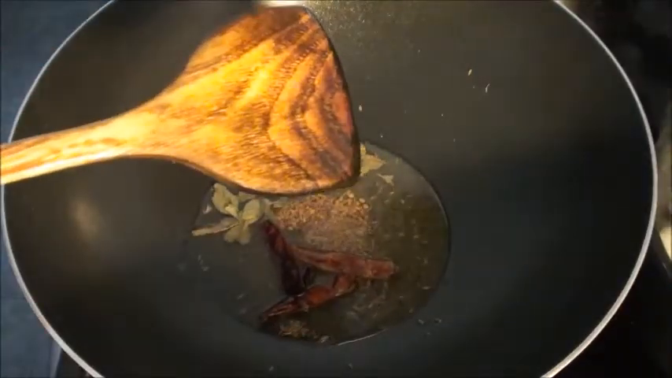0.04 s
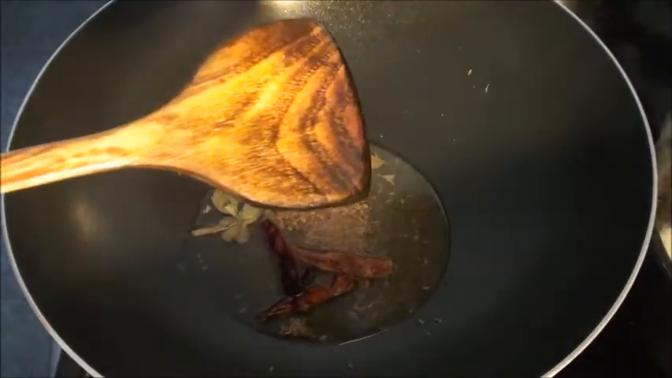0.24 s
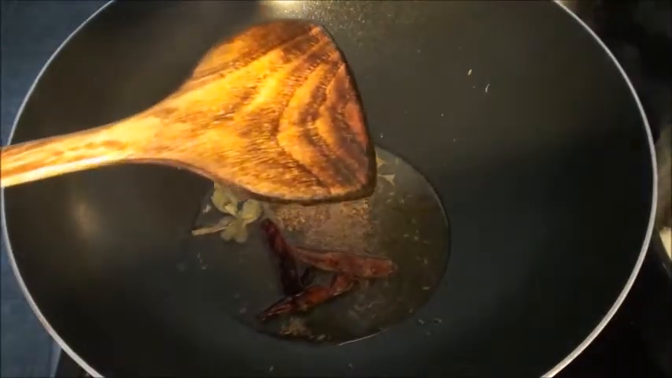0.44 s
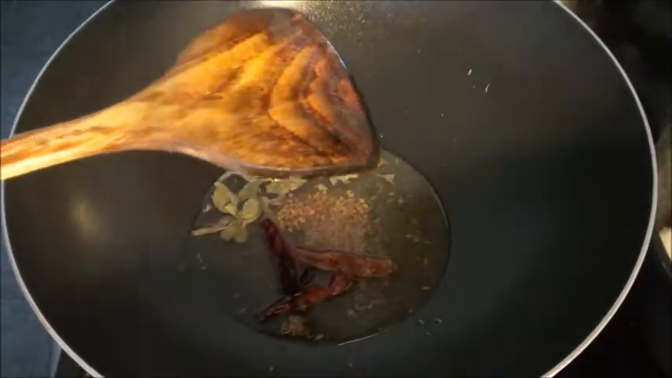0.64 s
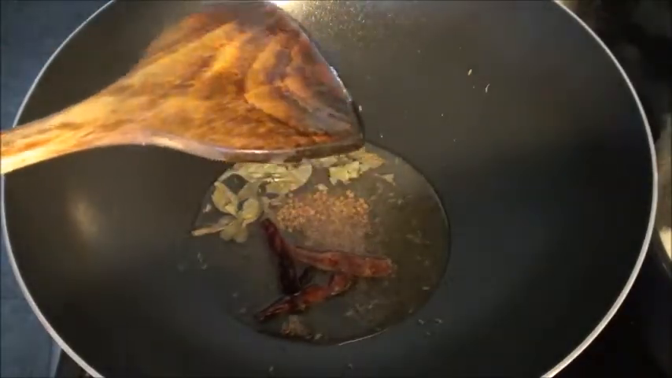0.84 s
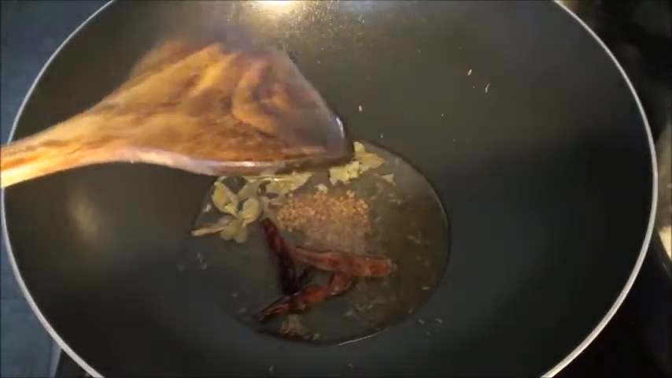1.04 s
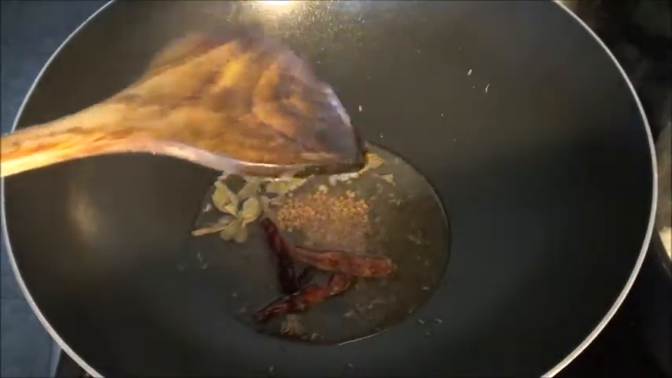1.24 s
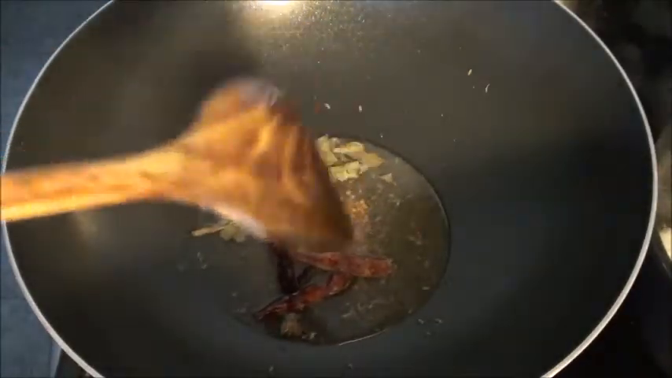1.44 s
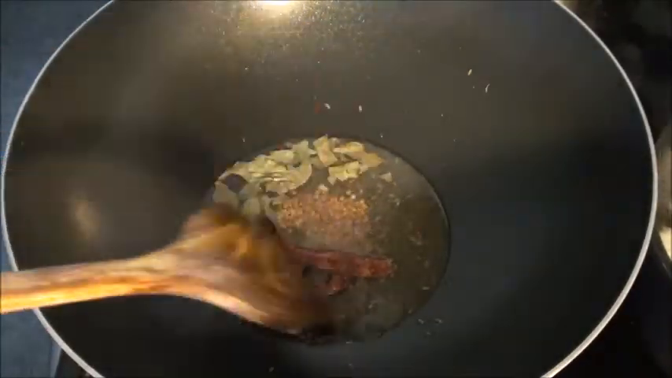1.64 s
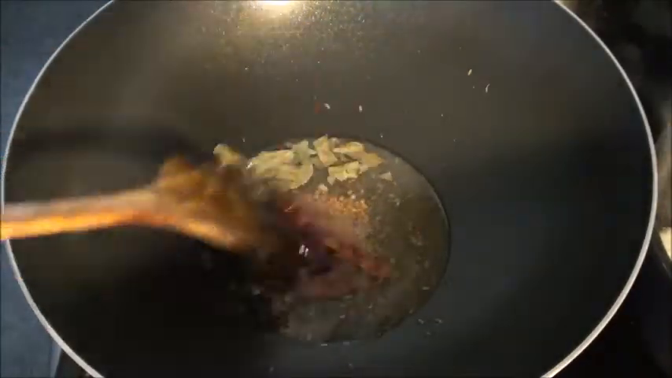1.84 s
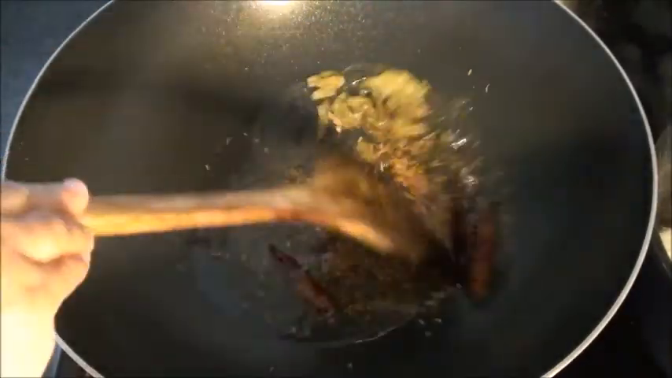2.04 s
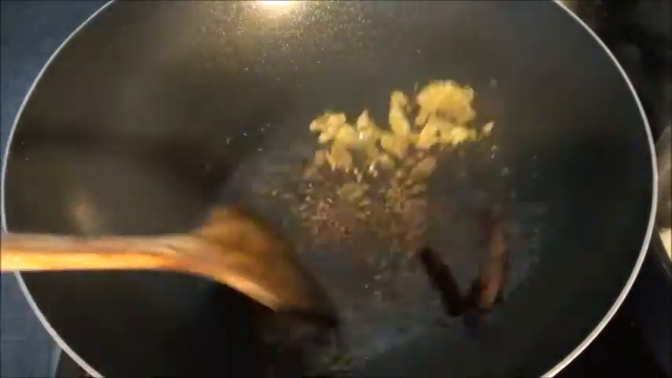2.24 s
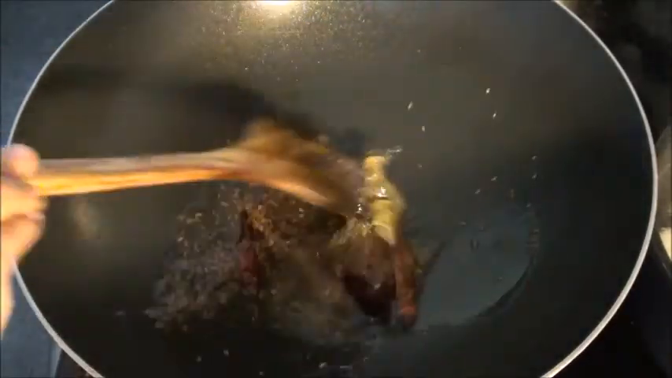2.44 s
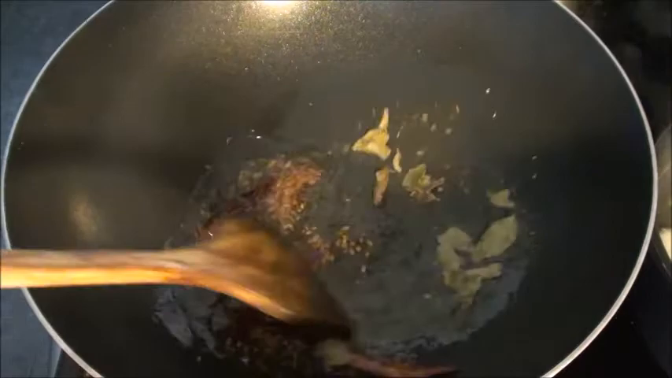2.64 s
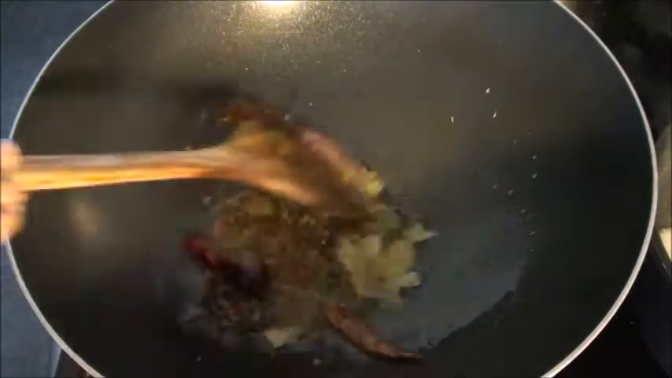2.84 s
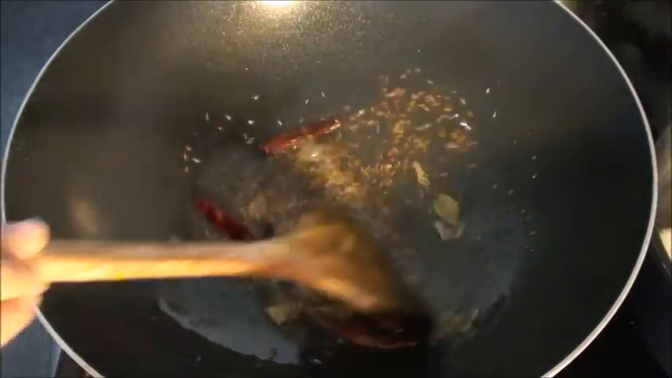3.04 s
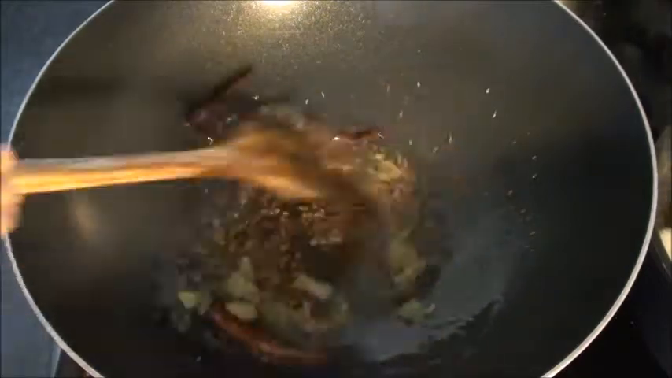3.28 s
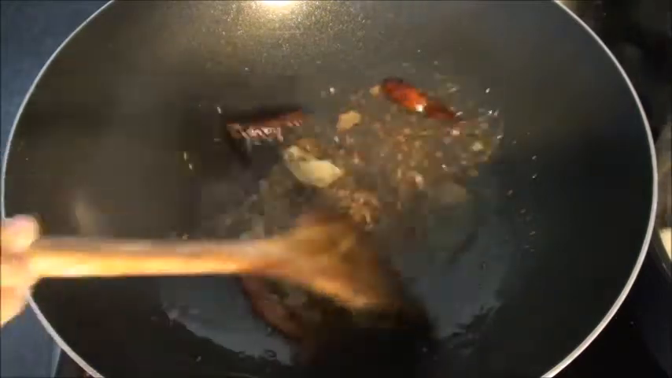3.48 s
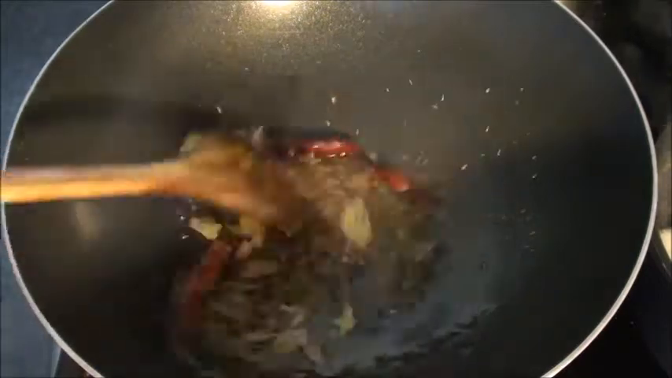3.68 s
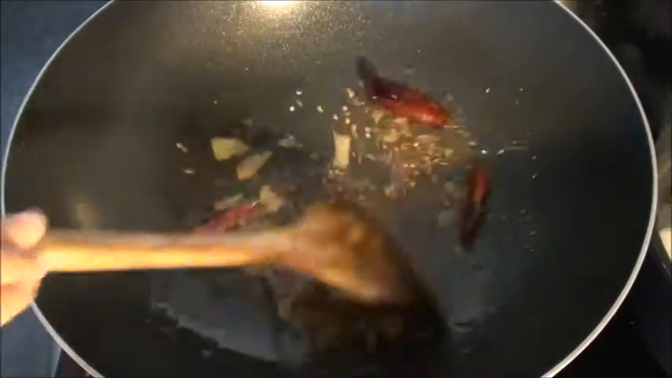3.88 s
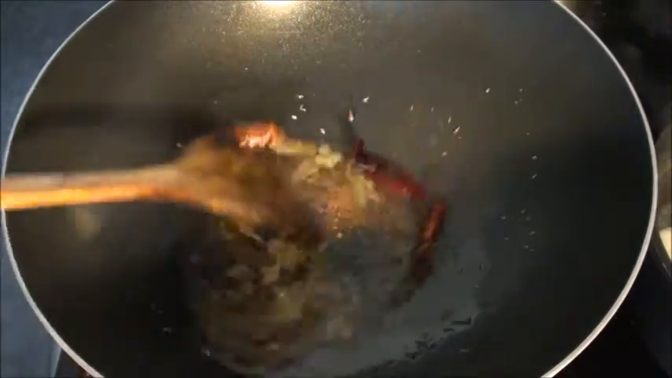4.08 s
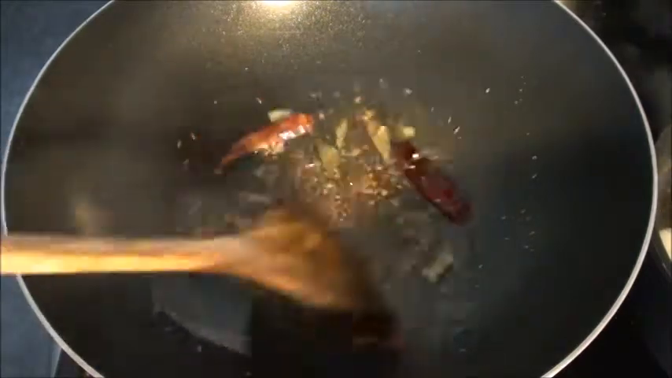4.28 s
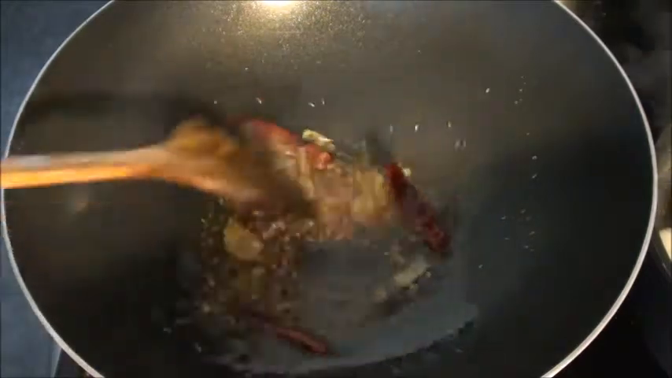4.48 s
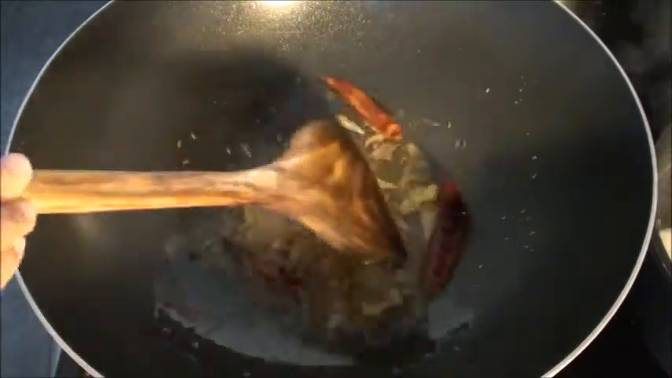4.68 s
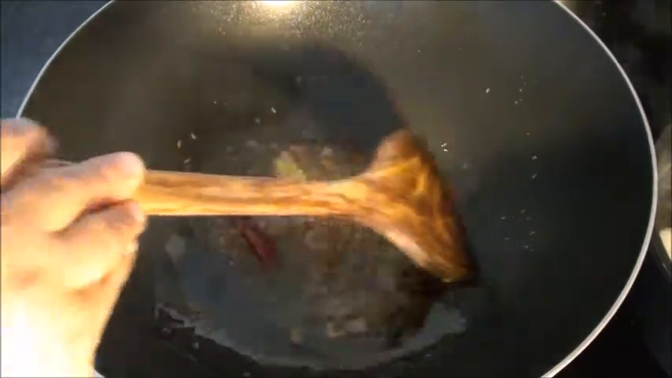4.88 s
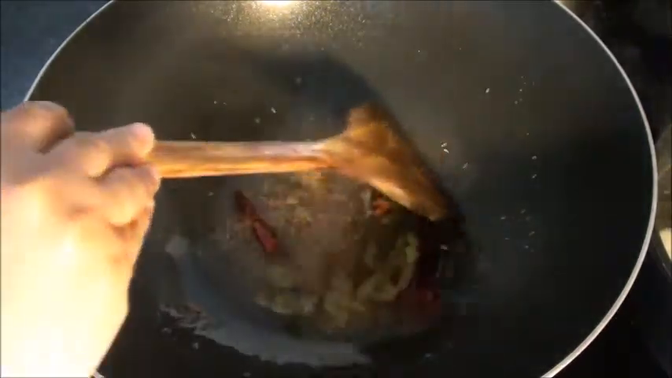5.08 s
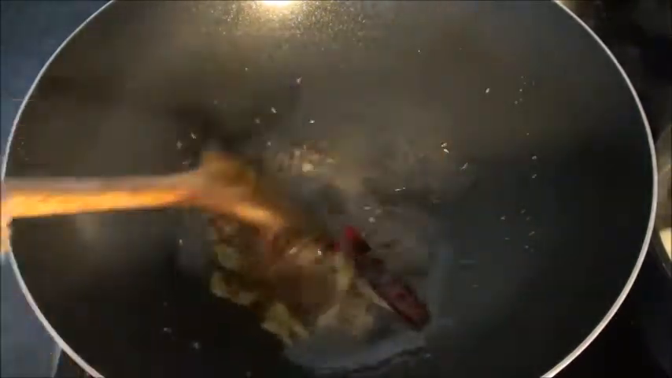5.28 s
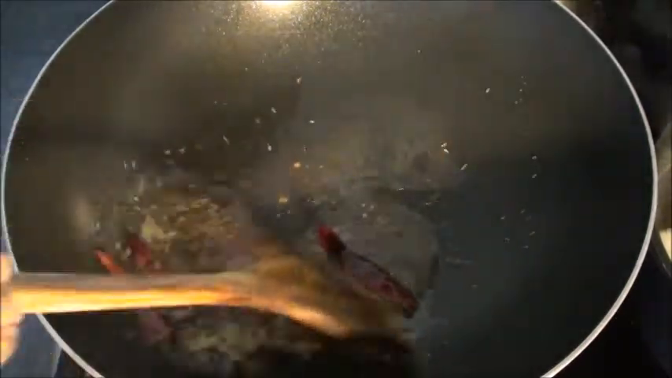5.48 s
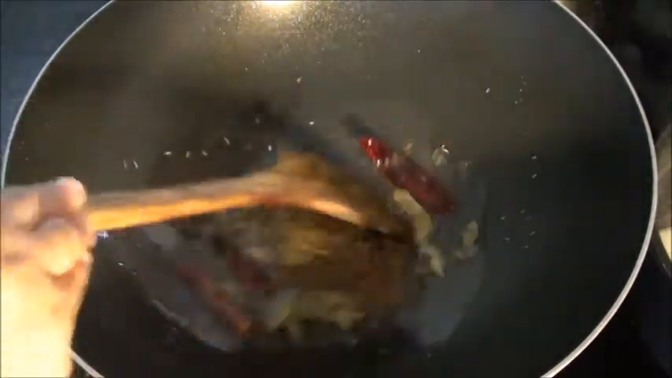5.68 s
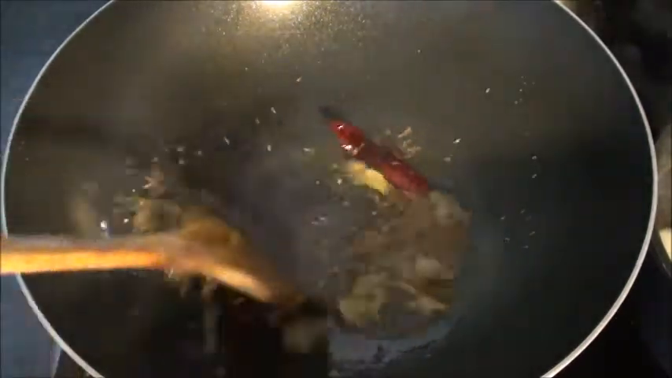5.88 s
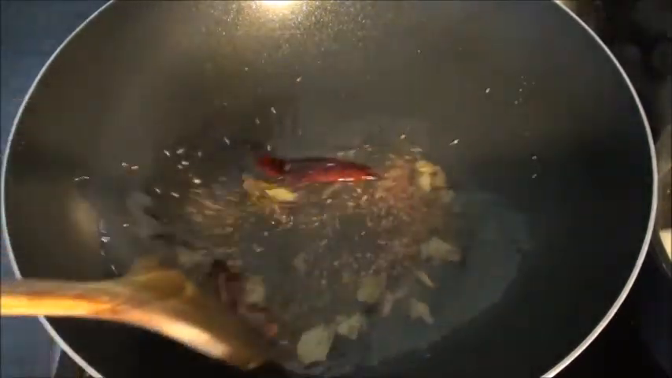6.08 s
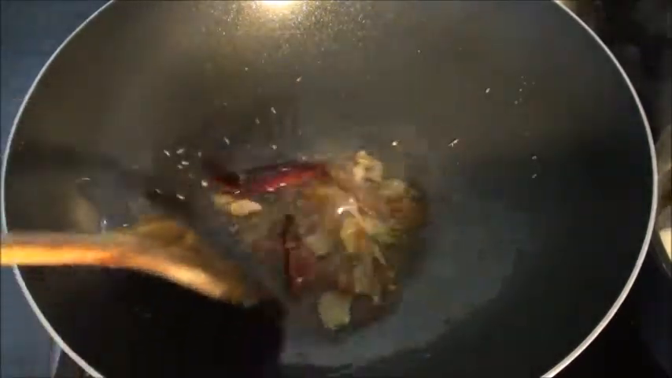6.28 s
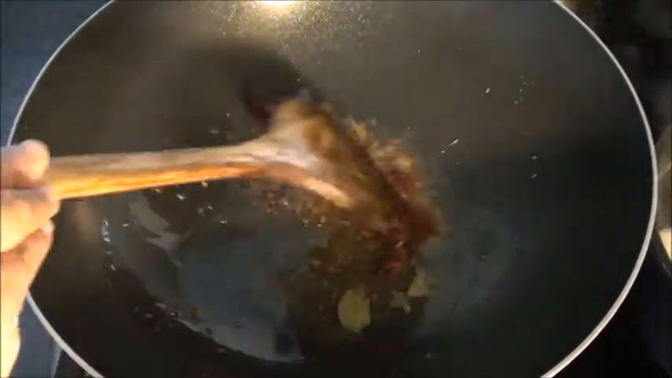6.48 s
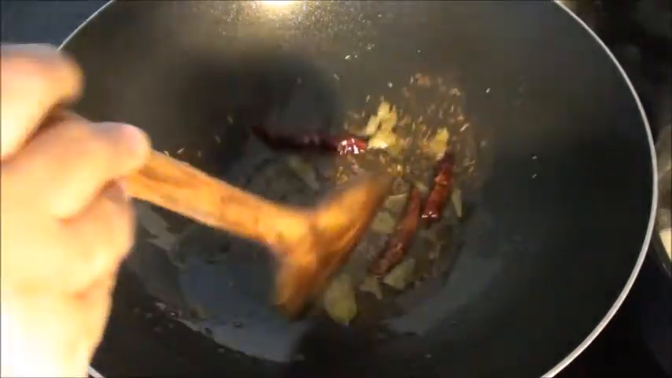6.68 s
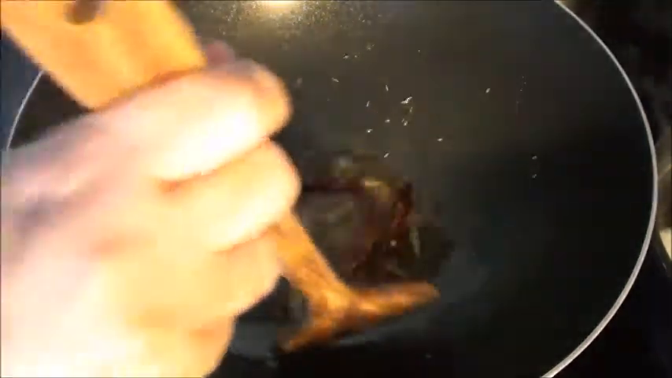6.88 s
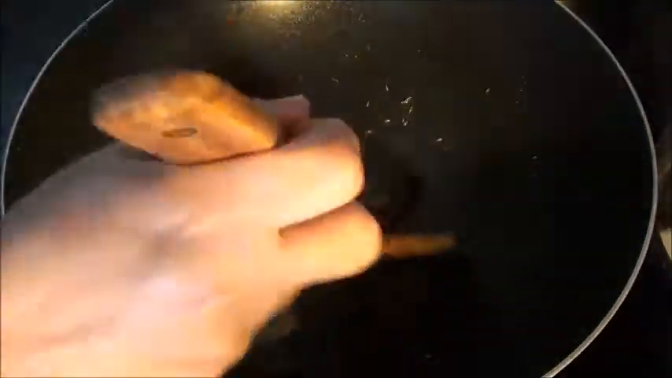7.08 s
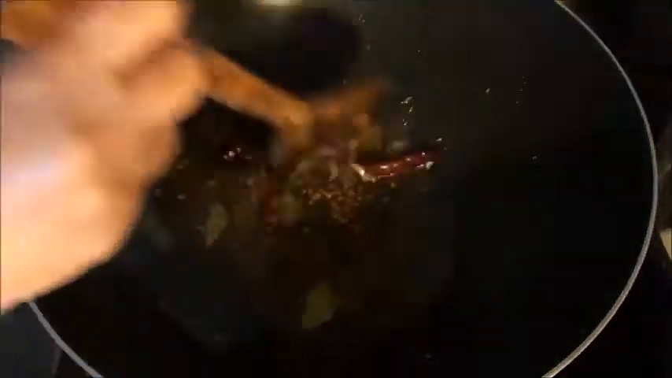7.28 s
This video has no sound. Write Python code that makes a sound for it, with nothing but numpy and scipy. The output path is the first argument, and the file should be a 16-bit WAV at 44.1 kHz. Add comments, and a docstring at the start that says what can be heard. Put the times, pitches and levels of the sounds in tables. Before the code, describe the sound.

Nearly two seconds of quiet simmering with bright, isolated oil snaps and an early ringing clatter of a utensil out of sight. Then a dull wooden thud starts a sudden rush of crackling, hissing frying. Dull spatula bumps and gritty seed cracks come irregularly; later the sizzle dips and flares with slower strokes. Close microphone, nearly central image, short kitchen echo, low electric hum and soft air.

```python
"""Single steam bubbles burst sharply over a fine simmer while a utensil clatters out of sight; then a wooden
spatula stirs moist whole spices in hot oil and the pops merge into a loud sizzle that slowly thins.
Bubbles are short decaying sine bursts echoing round a steel wok, massed at random for the sizzle; the spatula
and utensil are struck modes with noise for rubbing and rattling, and crushed seeds are runs of cracks.
Behind it all lie a low electric hum of wavering sines and soft, filtered-noise kitchen air."""
import sys
import numpy as np
from scipy import signal
from scipy.fft import rfft, irfft
from scipy.io import wavfile
from scipy.ndimage import uniform_filter1d, minimum_filter1d

SR = 44100
rng = np.random.default_rng(int(sys.argv[2]) if len(sys.argv) > 2 else 0)


def bounce(signal):
    """Save signal as a 16-bit WAV file at the path given by the first command-line argument."""
    frames = np.transpose(np.atleast_2d(signal))
    limited = np.clip(frames, -1, 1)
    pcm = np.round(limited * 32767).astype(np.int16)
    wavfile.write(sys.argv[1], SR, pcm)


N = 322812

# How hard the stirred spices fry, flaring with each of the last, slower strokes.
# Each row: time in seconds, level in dB before the coarse and spray balance.
STIRRED_LEVEL = [(1.79, -22.5), (2.06, -15), (2.5, -15), (3.3, -13.5), (3.45, -14.5), (4.1, -15),
                 (4.85, -17.5), (5.24, -20.5), (5.5, -17), (5.97, -16), (6.12, -20.5), (6.53, -16),
                 (6.8, -19.5), (6.89, -22), (7.1, -20.5), (7.32, -18)]
# Tone of the frying. Each row: frequency in Hz, relative gain in dB.
SIZZLE_TONE = [(250, -45), (700, -15), (1100, -13.5), (1600, -6.5), (2400, -10), (3100, -1.5), (4500, 0.5),
               (6500, 1.5), (8000, -.5), (9000, -6), (11000, -11), (13000, -21), (16000, -19.5)]
# The fine simmer before the stirring. Each row: time in seconds, level in dB.
SIMMER_LEVEL = [(0, -26), (.5, -30.5), (.63, -32.5), (1.12, -33), (1.25, -35), (1.4, -30), (1.78, -36)]
# Loud steam bursts, and single seed cracks under the blade (the low-pitched rows during the stirring). # Each
# row: start in seconds, peak in dB before the pop tone, pitch in Hz, # cycles until 60 dB down, bowl echo in dB
# against the direct burst.
SHARP_POPS = [(0.0865, -8, 7050, 7, 8), (0.3672, -1.5, 5900, 9, 5), (0.395, -9, 4430, 8, 11),
              (0.4208, -1, 3230, 24, -1), (0.5139, -8.5, 3780, 2.6, 10), (0.538, -8, 5290, 4, 13),
              (0.6968, -5.5, 2750, 2.2, 3), (0.7285, -0.5, 4860, 7.8, 3), (0.8265, -10, 4730, 1.4, 7),
              (0.872, -11.5, 3500, 8.8, -3), (0.894, -5, 7300, 14, 4), (0.934, -7.5, 4900, 2, 17),
              (1.0438, -9.5, 6450, 29, 0), (1.165, -9.5, 3920, 4, 4), (1.3219, -2, 3040, 6.4, -1),
              (1.344, -5, 4850, 12, 5), (1.414, -13.5, 8900, 5, 1), (1.4257, -7.5, 3180, 3.7, -3),
              (1.4337, -0.5, 7500, 3.4, 2.5), (1.5324, -3.5, 3080, 1.3, 6), (1.5688, -6, 8500, 7, -2),
              (1.6356, -4.5, 6500, 17, 15), (1.6912, -13, 6400, 16, 7), (1.736, -9, 7000, 27, 0),
              (1.8043, -8, 4270, 12, 7), (1.8543, -7, 8000, 18, -4), (1.8782, -1.5, 3330, 8, 4),
              (1.9691, 6, 7700, 3.1, 11), (2.163, 1.5, 4070, 15, 10), (2.4334, -1, 2180, 10, 0),
              (2.5888, -2, 2030, 19, 1), (2.7222, -1.5, 3660, 19, 3), (3.2044, 4.5, 2220, 14, -6),
              (3.9108, 0, 3280, 3, 6), (3.9934, 4.5, 3300, 14, 1), (4.3187, -1, 2400, 2.5, 10),
              (4.4425, 2.5, 2150, 18, 7), (5.1043, 2, 3060, 3.2, -2), (5.1977, 7, 3430, 4.6, -9),
              (5.2914, 7, 5030, 3.2, -5), (5.848, 13, 5670, 4, -1), (5.9247, 4.5, 4340, 4.3, 5),
              (6.5998, 4, 7000, 21, 2.5), (6.651, 5.5, 6490, 31, -11), (6.7417, -2, 7200, 15, -2),
              (6.7988, -1.5, 4760, 11, 8), (7.012, 10, 4700, 7.4, -1), (7.1154, 11.5, 2530, 3.3, -10.5)]
# Tone of pops and plops. Each row: frequency in Hz, gain in dB.
POP_TONE = [(150, -15), (600, -14), (1200, -7), (3000, -0.5), (8000, 4), (9500, -4.5), (13000, -4),
            (16000, -16)]
# Big slow bubbles. Each row: start in seconds, peak in dB before the pop tone, pitch in Hz.
SLOW_BUBBLES = [(0.036, -8, 1570), (0.0642, -2, 1300), (0.1353, -10, 1850), (1.5426, -12.5, 1490),
                (1.886, -7, 1700), (3.4185, -12, 1420), (3.996, -2, 1520), (4.7997, -2, 1950),
                (5.1484, -8, 1600)]
# Spatula against the wok. Each row: start in seconds, thud peak in dB before the contact filter.
SPATULA_KNOCKS = [(1.797, -17), (1.848, -33), (2.135, -36), (2.385, -38), (2.51, -39), (2.796, -34),
                  (2.95, -40), (3.225, -38), (3.266, -19.5), (4.483, -35), (5.048, -20.5), (5.712, -28),
                  (6.135, -32), (6.165, -38), (6.913, -32)]
# Modes of the wok on its stand. Each row: frequency in Hz, relative level in dB, 60 dB decay in seconds.
WOK_MODES = [(143, 0, 0.18), (160, 15, 0.062), (204, -16, 0.045), (249, -8.5, 0.028), (336, -4, 0.097),
             (393, -0.5, 0.074), (491, 3.5, 0.1), (629, 7, 0.068), (715, -11, 0.028), (830, 4, .04)]
# What a soft, oily contact passes on. Each row: frequency in Hz, gain in dB.
CONTACT_TONE = [(30, -13), (80, -10), (125, 4), (600, 4), (900, -6.5), (2000, -36)]
# Wood rubbing on oiled steel. Each row: frequency in Hz, relative gain in dB.
RUB_TONE = [(40, -18.5), (90, -14), (140, 8.5), (180, 1), (250, -11), (480, -12), (700, -13.5), (1200, -18),
            (4000, -69)]
# The blade grinds over seeds. Each row: start in seconds, length in seconds, highest possible crack peak
# in dB, central pitch in Hz.
SEED_CRUNCHES = [(2.623, 0.064, -3.5, 3290), (3.061, 0.083, -6, 3700), (3.206, 0.037, -11, 2340),
                 (4.063, .04, -10, 3540), (4.407, 0.098, -9, 2600), (4.777, .025, -9, 2630),
                 (4.948, .02, -13, 2600), (5.14, 0.082, -15, 2200), (5.32, .05, -21, 1480),
                 (5.801, 0.092, -14.5, 2700), (6.351, 0.059, -8, 3500), (6.941, 0.043, -15.5, 2340)]
# The utensil's bounces. Each row: start in seconds, ring peak in dB, rattle peak in dB.
BOUNCES = [(.146, 3.5, -8.5), (.176, -6.5, -7), (0.187, -33, -11), (.197, -23, -10), (0.203, -23, -11.5),
           (0.215, -32, -8), (.251, -19, -11)]
# Modes of the utensil. Each row: frequency in Hz, relative level in dB, 60 dB decay in seconds.
UTENSIL_MODES = [(1160, -24, .18), (1238, -9.5, 0.42), (1560, -7.5, 0.47), (1520, -12, 0.19),
                 (2056, -7.5, 0.54), (2120, -2, 0.13), (2860, 1.5, 0.098), (3300, 4, 0.1), (3170, 6, 0.095),
                 (5755, 10.5, 0.045), (6440, 0, 0.084), (6460, 4, .06), (8053, 0, .06), (9530, 2.5, 0.045)]
# Tone of the rattle. Each row: frequency in Hz, relative gain in dB.
RATTLE_TONE = [(150, -37), (250, -12.5), (1180, 1.5), (1890, 3.5), (2050, 3), (2510, -6), (3020, 4.5),
               (5270, -9.5), (6450, -4.5), (9830, -33), (14000, -52)]
# Mains hum and motor lines. Each row: frequency in Hz, rms level in dB about which it wavers.
HUM_LINES = [(59.2, -54.5), (118.4, -52.5), (355.3, -57.5), (473.7, -59.5), (532.9, -55), (592.2, -62.5),
             (1183, -63.5), (1302, -61.5), (1743, -56)]
# Tone of the kitchen air. Each row: frequency in Hz, relative gain in dB.
AIR_TONE = [(25, -34), (60, -24), (100, -4), (160, 2), (280, 0.5), (400, 1), (520, 3.5), (750, -3.5),
            (1100, 1), (3000, -10.5), (8000, -53), (16000, -22)]
# How much left and right differ. Each row: frequency in Hz, side gain in dB.
STEREO_WIDTH = [(60, -32), (150, -84), (350, -46), (1500, -29), (5500, -11.5), (9000, -19.5), (14000, -101)]

STIR_S = 1.785  # the stirring begins
# burst rate doubles every few dB of level and halves as the spices dry
SIMMER_BURSTS_PER_S, FULL_BURSTS_PER_S, FULL_DB, DOUBLING_DB, HALVING_S = 380, 2900, -14, 3, 3.5
# coarse bubbles need moisture: they dwindle with drying and return when the blade presses
COARSE_DB, DRYING_DB_PER_S, PRESS_DB, PRESS_S = -.5, 1.02, 1.5, 0.037
# the first push plunges the wettest pieces under the oil: a brief flush of coarse bubbles
PLUNGE_DB, PLUNGE_S = 7, .15
SPRAY_DB, SPRAY_WANDER_DB, WANDER_PER_S = 4, 0.7, 5
# against a firm knock, a lighter one is tilted brighter and rubs on more quietly but for longer
FIRM_DB, TILT_DB_PER_OCTAVE_PER_DB = -18.5, -0.2
RUB_DB, RUB_PER_DB, RUB_T60_S, RUB_DOUBLING_DB = -22.5, .6, .08, 18
UTENSIL_PAN_DB = -2.3  # left over right: it lies a little to the right
TOP_HZ = 16100


def frying(tick_db=-8, hiss_db=-13):
    """Bubbles ring in the bowl, dry ticks of spray fly above a faint hiss; stirring frees far more steam."""
    t = np.arange(N) / SR
    since_stir = t - STIR_S
    stirred_db, = curves(STIRRED_LEVEL)
    simmer_db, = curves(SIMMER_LEVEL)
    stirring = np.clip(since_stir / 0.018, 0, 1)
    doublings = (stirred_db - FULL_DB) / DOUBLING_DB - since_stir / HALVING_S
    rate = SIMMER_BURSTS_PER_S + stirring * FULL_BURSTS_PER_S * 2 ** doublings

    bubbles = swarm(rate, 1290, 14400, ring_t60=0.0022, echo_db=2.5, spread_db=4.5, count=60)
    ticks = swarm(0.046 * rate + 8, 8800, 13200, ring_t60=0.00071, echo_db=-13, spread_db=6.5,
                  largest=2.46, count=6)
    hiss = rng.standard_normal(N)
    mixture = bubbles + undb(tick_db) * ticks + undb(hiss_db) * hiss
    sound = unit(colour(mixture, SIZZLE_TONE))

    presses = [np.exp(-.5 * ((t - s - length / 2) / PRESS_S) ** 2) for s, length, _, _ in SEED_CRUNCHES]
    pressing = np.max(presses, axis=0)
    plunging = np.exp(-np.abs(since_stir) / PLUNGE_S)
    coarse_db = COARSE_DB - DRYING_DB_PER_S * since_stir + PRESS_DB * pressing + PLUNGE_DB * plunging
    spray_db = SPRAY_DB + SPRAY_WANDER_DB * wander(WANDER_PER_S)
    coarse = signal.sosfiltfilt(signal.butter(2, 2600, fs=SR, output="sos"), sound)
    spray = signal.sosfiltfilt(signal.butter(2, 9500, "high", fs=SR, output="sos"), sound)
    stirred = sound + (undb(coarse_db) - 1) * coarse + (undb(spray_db) - 1) * spray
    return stirring * undb(stirred_db) * stirred + (1 - stirring) * undb(simmer_db) * sound


def swarm(rate, low_hz, high_hz, ring_t60, echo_db, spread_db, largest=3.3, count=60):
    """Random bursts at count pitches, all equally brief, with sizes far apart."""
    out = np.zeros(N)
    expected = np.cumsum(np.maximum(rate, 1)) / SR / count
    for hz in np.linspace(low_hz, min(high_hz, .45 * SR), count):
        gap, size = rng.exponential(size=(1000, 2)).T
        at = np.searchsorted(expected, np.cumsum(gap))
        pulses = np.bincount(at, undb(spread_db * np.minimum(size, largest)), N + 1)[:N]
        spot_db = 3 * rng.standard_normal()
        sound = burst(hz, ring_t60 * hz, echo_db + spot_db, swell_cycles=0.48)
        out += signal.oaconvolve(pulses, sound / np.linalg.norm(sound))[:N]
    # the steam given off over a quarter second is steady, however it is split into bursts
    power = uniform_filter1d(out ** 2, SR // 4)
    return out / np.sqrt(power + 0.0072 * power.mean())


def burst(hz, cycles, echo_db, bowl_t60=0.077, swell_cycles=0.55):
    """A bubble swells, bursts and rings a few cycles; the steel bowl throws it back and forth."""
    t = seconds(.05)
    swell = 1 - np.exp(-t * hz / max(swell_cycles, .1))
    direct = np.sin(2 * np.pi * hz * t) * swell * fade(t, max(cycles, 1) / hz)
    echoes = signal.fftconvolve(direct, tail(bowl_t60))
    sound = echoes * undb(echo_db) * np.linalg.norm(direct) / np.linalg.norm(echoes)
    sound[:len(t)] += direct
    return sound


def pops():
    """Sudden steam bursts ring high and short, single seed cracks a little lower; big slow bubbles ring lower
    with a longer bowl echo."""
    out = np.zeros(N)
    for s, db, hz, cycles, echo_db in SHARP_POPS:
        add(out, s, loud(burst(hz, cycles, echo_db, swell_cycles=0.3), db, crest_db=12.5))
    for s, db, hz in SLOW_BUBBLES:
        add(out, s, loud(burst(hz, cycles=10.3, echo_db=12, bowl_t60=0.1), db, crest_db=10.0))
    return colour(out, POP_TONE)


def spatula():
    """Oily wood lands softly, rocks the wok and rubs on along the steel."""
    thuds, rubs = np.zeros(N), np.zeros(N)
    lowest_hz = WOK_MODES[0][0]
    for s, db in SPATULA_KNOCKS:
        force_db = db - FIRM_DB
        tilt_db = TILT_DB_PER_OCTAVE_PER_DB * force_db
        modes = [(hz, mode_db + tilt_db * np.log2(hz / lowest_hz), t60) for hz, mode_db, t60 in WOK_MODES]
        add(thuds, s, peak(ring(modes, scatter_db=1.5), db))
        rub_t60 = min(RUB_T60_S * 2 ** (-force_db / RUB_DOUBLING_DB), 1)
        rub = colour(tail(rub_t60), RUB_TONE)
        add(rubs, s, peak(rub, RUB_DB + RUB_PER_DB * force_db))
    return colour(thuds, CONTACT_TONE) + rubs


def seeds(count=6):
    """Each crunch is a quick, uneven run of cracks of similar pitch."""
    out = np.zeros(N)
    for s, length, db, hz in SEED_CRUNCHES:
        for k, (delay, pitch, size) in enumerate(rng.random((count, 3))):
            crack = burst(hz * np.exp(.6 * (pitch - .5)), cycles=18.3, echo_db=-9)
            add(out, s + length * (k + delay) / count, peak(crack, db - 7 * size))
    return out


def utensil():
    """A hard utensil drops and bounces to rest: each blow rings its modes and adds a noisy rattle."""
    out = np.zeros(N)
    for s, ring_db, rattle_db in BOUNCES:
        rattle = colour(tail(t60=.1), RATTLE_TONE)
        add(out, s, peak(ring(UTENSIL_MODES, scatter_db=0.5), ring_db))
        add(out, s, loud(rattle, rattle_db, crest_db=7.5))
    return out


def kitchen(air_db=-45, waver_db=1.9):
    """Mains hum and motor lines that waver a little in level, over soft air noise."""
    t = np.arange(N) / SR
    knots = np.linspace(0, t[-1], 30)
    hum = 0
    for hz, db in HUM_LINES:
        waver = np.interp(t, knots, rng.standard_normal(len(knots)))
        amplitude = np.sqrt(2) * undb(db + waver_db * waver)
        hum = hum + amplitude * np.sin(2 * np.pi * (hz * t + rng.random()))
    return hum + undb(air_db) * unit(colour(rng.standard_normal(N), AIR_TONE))


def ring(modes, scatter_db):
    """Struck modes; every blow lands elsewhere and weights them anew."""
    t = seconds(.5)
    out = np.zeros(len(t))
    for hz, db, t60 in modes:
        weight = undb(db + scatter_db * rng.standard_normal()) * rng.choice([-1, 1])
        out += weight * np.sin(2 * np.pi * hz * t) * fade(t, t60)
    return out


def tail(t60):
    """Dense dying echoes as decaying noise of energy 1."""
    t = seconds(min(t60, 2))
    echoes = rng.standard_normal(len(t)) * fade(t, t60)
    return echoes / np.linalg.norm(echoes)


def colour(x, points, size=4096):
    """Causal minimum-phase filter through (Hz, dB) points."""
    hz, db = np.transpose(points)
    bins = np.maximum(np.fft.rfftfreq(size, 1 / SR), 1)
    cepstrum = irfft(np.log(undb(np.interp(np.log(bins), np.log(hz), db))))
    # folding the cepstrum onto positive time puts the energy first
    response = irfft(np.exp(rfft(2 * cepstrum[:size // 2], size) - cepstrum[0]))
    return signal.oaconvolve(x, response)[:len(x)]


def wander(rate):
    """A slow random curve of spread near 1, with rate turns a second."""
    turns = rng.standard_normal(1000)
    return np.interp(np.arange(N) / SR * rate, np.arange(len(turns)), turns)


def loud(x, db, crest_db=9):
    """Scale a burst by its loudest 5 ms, whose peaks are taken to stand crest_db above their rms."""
    power = uniform_filter1d(x ** 2, SR // 200, mode="constant")
    return x * undb(db - crest_db) / np.sqrt(power.max())


def peak(x, db):
    """Scale to a peak level."""
    return x * undb(db) / np.abs(x).max()


def unit(x):
    """Scale to rms 1."""
    return x / np.sqrt(np.mean(x ** 2))


def undb(db):
    """Decibels to gain."""
    return 10 ** (np.asarray(db) / 20)


def fade(t, t60):
    """Exponential decay, 60 dB down at t60."""
    return np.exp(-np.log(1000) * t / max(t60, 1e-4))


def seconds(length):
    """A time axis."""
    return np.arange(int(length * SR)) / SR


def curves(table):
    """The value columns of a table, interpolated sample by sample."""
    s, *columns = np.transpose(table)
    return [np.interp(np.arange(N) / SR, s, c) for c in columns]


def add(track, s, sound):
    """Mix a sound in at time s."""
    start = max(int(s * SR), 0)
    track[start:start + len(sound)] += sound[:N - start]


def scene(room_db=-15, far_room_db=-12, air_side_db=-63):
    """Nearly central sources echo off the kitchen walls; random offsets give the bursts their own spots."""
    near = frying() + pops() + spatula() + seeds()
    far = utensil()
    room = np.pad(tail(t60=.35), (SR // 100, 0))  # echoes start 10 ms late
    walls = signal.oaconvolve(undb(room_db) * near + undb(far_room_db) * far, room)[:N]
    mid = near + far + walls
    spot = unit(uniform_filter1d(rng.standard_normal(N), SR // 100))  # left or right, over some 10 ms
    side = colour(signal.oaconvolve(mid * spot, tail(t60=0.028))[:N], STEREO_WIDTH)
    side = side + undb(air_side_db) * unit(colour(rng.standard_normal(N), AIR_TONE))
    side = side + far * np.tanh(np.log(undb(UTENSIL_PAN_DB)) / 2)
    mid = mid + kitchen()
    return np.array([undb(-0.13) * (mid + side), undb(0.1) * (mid - side)])


def record(dry):
    """The sharpest peaks are ducked for a few milliseconds and a steep low-pass cuts the top."""
    need = np.minimum(1, .88 / (np.abs(dry).max(axis=0) + 1e-9))
    gain = uniform_filter1d(minimum_filter1d(need, SR // 300), SR // 300)
    return signal.sosfilt(signal.ellip(10, .2, 80, TOP_HZ, fs=SR, output="sos"), dry * gain)


dry = scene()
out = record(dry)
bounce(out)
```